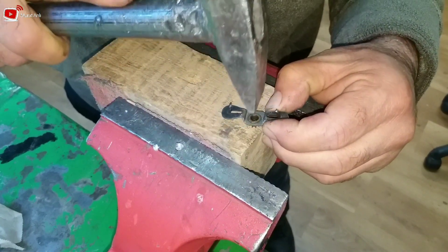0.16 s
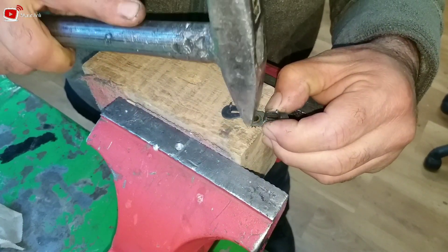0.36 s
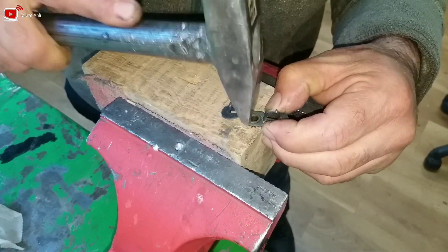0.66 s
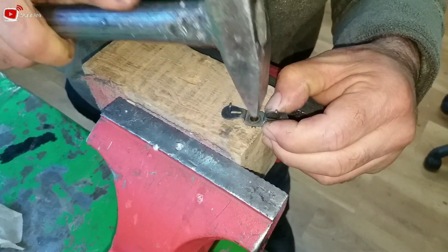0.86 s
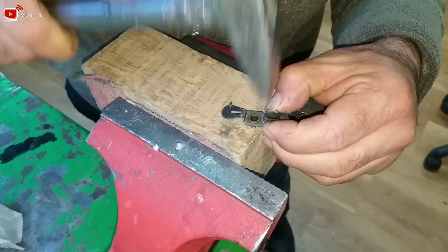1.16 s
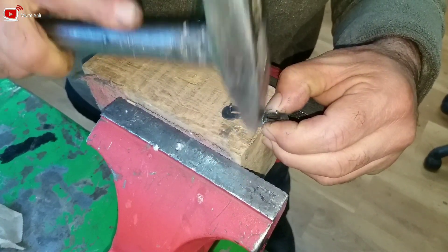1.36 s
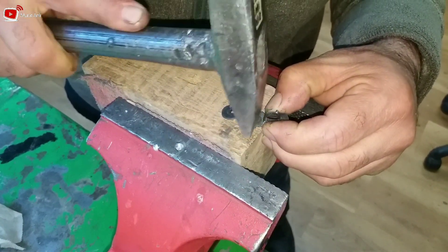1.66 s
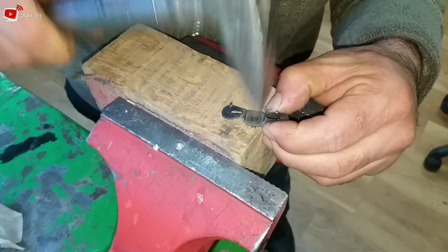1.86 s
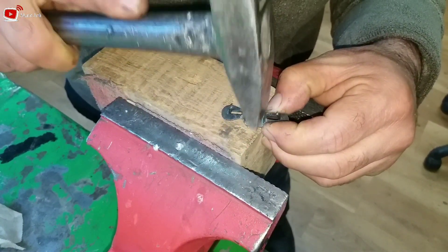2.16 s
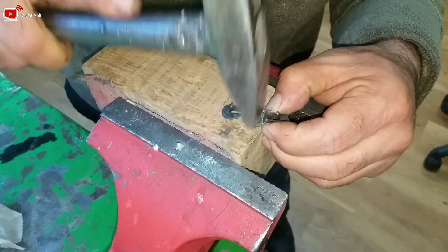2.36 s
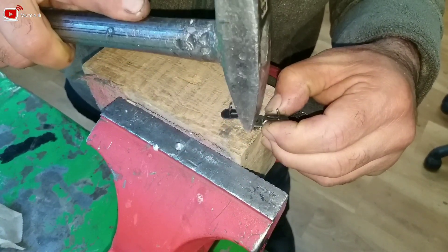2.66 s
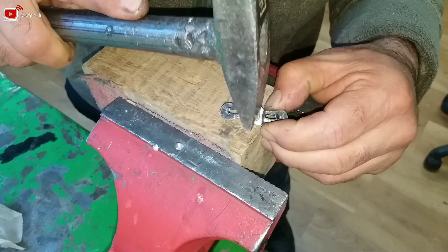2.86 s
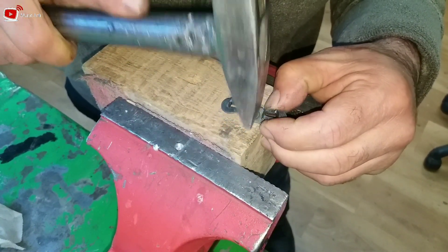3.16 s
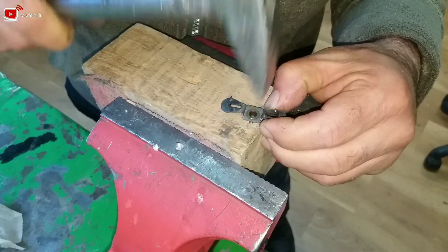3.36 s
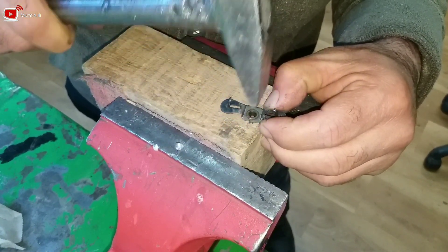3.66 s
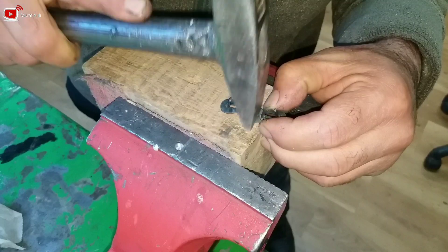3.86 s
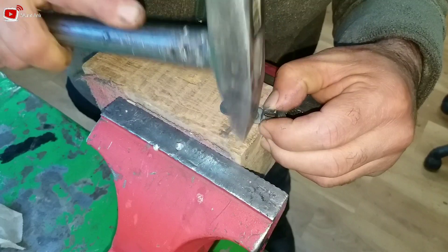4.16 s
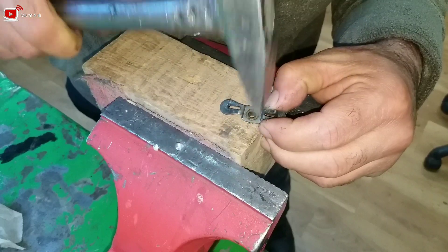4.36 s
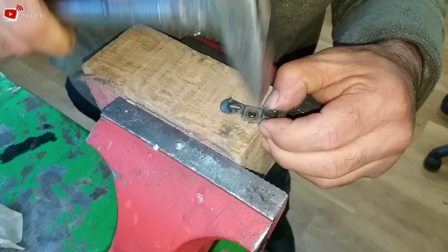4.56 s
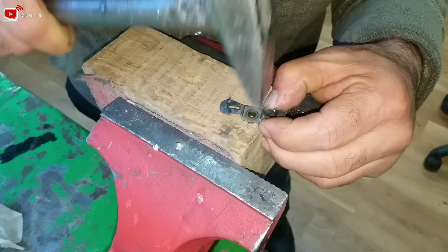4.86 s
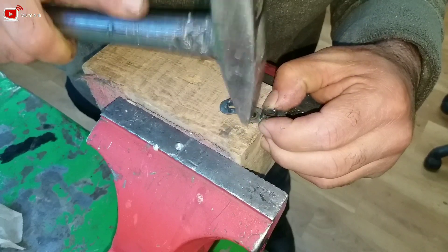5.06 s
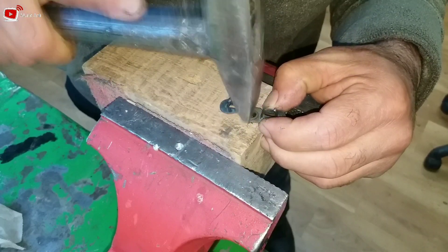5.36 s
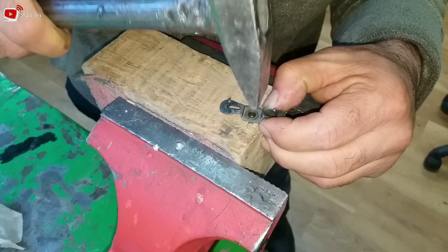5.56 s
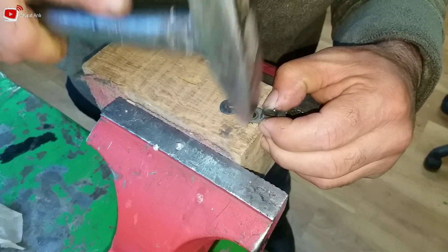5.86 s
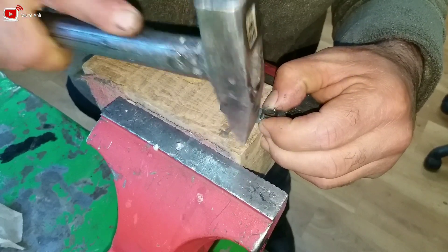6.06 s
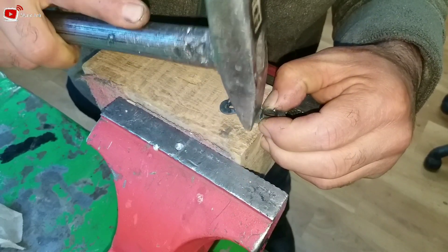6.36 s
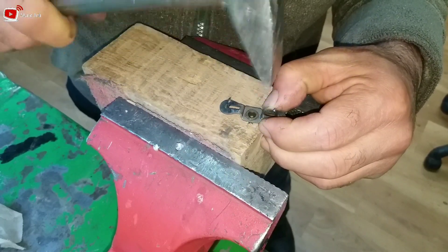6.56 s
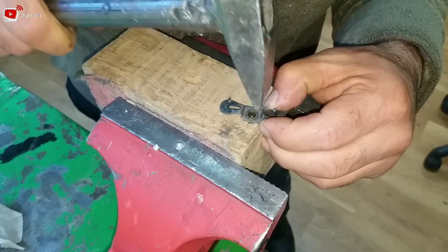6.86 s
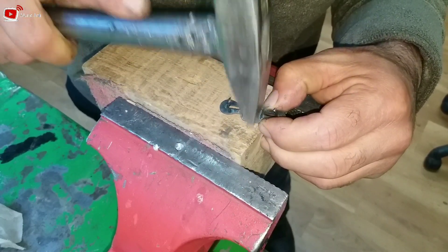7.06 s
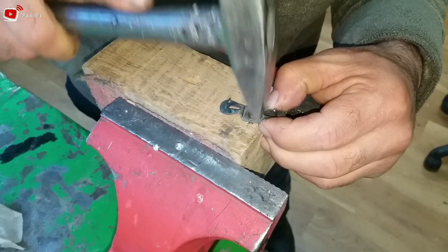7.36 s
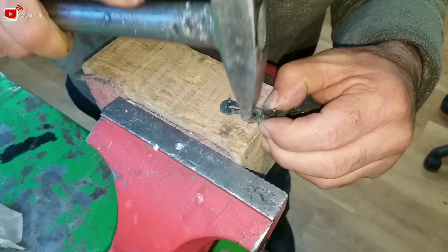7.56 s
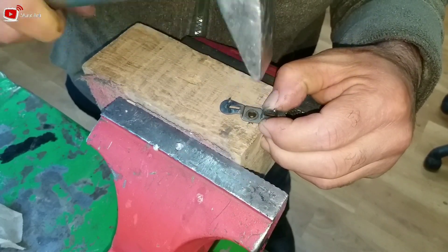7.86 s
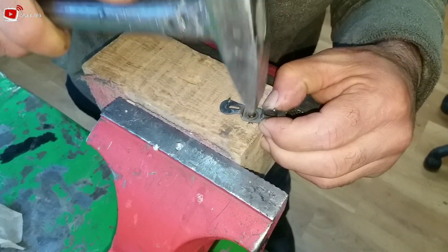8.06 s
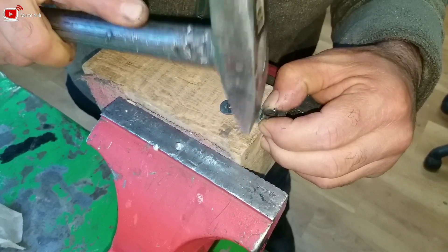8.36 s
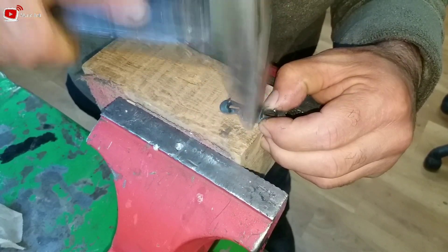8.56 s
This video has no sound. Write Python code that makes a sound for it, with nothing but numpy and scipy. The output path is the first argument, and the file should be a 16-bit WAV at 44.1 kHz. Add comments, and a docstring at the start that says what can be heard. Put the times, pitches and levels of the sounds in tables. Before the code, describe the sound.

A steel hammer strikes a small rivet on a wooden block held in a vice, close to the microphone in a bare workshop. From about 0.3 seconds, light aiming taps alternate with hard blows, roughly three strokes a second. Each is a sharp clack of steel with a knock of wood, followed at once by a tiny tick as the head bounces. The hard blows are fuller and set the bench and room booming, with a short echo and a lingering low ring. After a tap at about 2.2 seconds the hammering pauses, and the head just touches the rivet with two faint clicks around 2.5 seconds. The strokes resume at about 3.2 seconds and keep the same light and heavy rhythm until a last hard blow at about 8.6 seconds. A faint low rumble and a thin hum continue underneath throughout.

```python
"""Setting a rivet in a bare workshop

Close by, a steel hammer sets a small rivet on a wooden block clamped in a vice. Hard blows alternate
with light aiming taps, about three a second, with one short pause; the head bounces once after each.
Each blow is a clack of steel and a knock of wood; bench and room boom on over a faint rumble and hum."""
import sys
import numpy as np
from scipy import signal
from scipy.io import wavfile
from scipy.ndimage import uniform_filter1d

SR = 44100
rng = np.random.default_rng(int(sys.argv[2]) if len(sys.argv) > 2 else 0)


def int16_out(signal):
    """Quantize to a 16-bit WAV file."""
    q = np.round(np.clip(np.atleast_2d(signal).T, -1, 1) * 32767)
    wavfile.write(sys.argv[1], SR, q.astype(np.int16))


N = 383611

# spectrum of the contact crack: (frequency [Hz], level [dB])
CRACK_EQ = [(30, -30), (70, 9), (140, 23.5), (500, 11), (1000, 10.5), (2000, 11), (2600, 8.5), (4400, 15.5),
            (5800, 11.5), (8100, 12.5), (9500, -2.5), (11000, -3), (12800, -6), (15000, -9)]
# quickly damped modes of block and workpiece: (frequency [Hz], level [dB], t60 [s])
BLOCK_MODES = [(1040, -26, .04), (1329, -22, .04), (1535, -19, .045), (1810, -11, .045), (2055, -19, .04),
               (3219, -23, .025), (3738, -18, .022), (4385, -10, .022), (4900, -19, .02), (7550, -21, .015)]
# a bite on the rivet's edge gives more tick: (frequency [Hz], share of the tick gain [0-1])
TICK_BANDS = [(4500, 0.076), (7000, .45), (11000, 1)]


def hammer(near_db_per_db=0.3543, steel_db=-4, bounce_s=0.031, scatter_s=0.003, poses=3):
    """Strokes, bounces and touches: the close sound, a room send per arm pose, the pushes on the bench."""
    # taps and blows: (time [s], force [dB], clack [dB], tick [dB], bounce relative to force [dB])
    strokes = [(0.3188, -16.5, -3.5, -11, -12.5), (0.603, 3.5, 0.5, -5, -14.5),
               (0.9961, -14.5, -2, 0.5, -12), (1.2808, .5, -1.5, 1.5, -25), (1.6198, -20.5, 3.5, 4, -14),
               (1.9022, -5.5, 4, 3.5, -29), (2.2322, -17, -2, -7, -32), (3.1841, -19, -3, -5.5, -25),
               (3.4874, -2, 0.5, 2, -15.5), (3.803, -13, 2, 0, -14.5), (4.0822, -4.5, 6, 3, -26.5),
               (4.421, -13, 2.5, 6, -20), (4.7005, -0.5, 0, 2.5, -15), (5.0664, -22, -0.5, -0.5, -25),
               (5.361, 1.5, 0.5, 0, -23), (5.722, -12.5, -6, -7, -11), (6.0096, 0, -0.5, 1.5, -19.5),
               (6.3391, -19, -8, 2, -13), (6.6327, -3.5, 0, 1.5, -24), (6.9632, -17.5, 2.5, 4, -16.5),
               (7.261, -3.5, -4, -1.5, -31), (7.6072, -13, 1, -27, -12), (7.9295, 2.5, 1.5, -1, -17),
               (8.2808, -13, -4, -0.5, -23), (8.569, 0.5, -3, 1, -14)]
    # clear modes of the steel head: (frequency [Hz], level [dB], t60 [s])
    head_modes = [(6490, -20, .11), (10570, -34, .07), (11790, -45, .06), (12650, -42, .07)]
    # in the pause the head just touches the rivet: (time [s], level [dB])
    touches = [(2.4909, -48), (2.5826, -32)]
    t = np.arange(8192) / SR
    near, sends, pushes = np.zeros((2, N)), np.zeros((poses, 2, N)), np.zeros((1, N))
    for k, (s, force_db, clack_db, tick_db, bounce_db) in enumerate(strokes):
        force, tone = amp(force_db), stroke_tone(force_db, clack_db, tick_db)
        crack = force * colour(steady_bass(strike(t)), tone)
        # the fingers' grip shifts the modes of the workpiece a little from blow to blow
        ringing = ring(t, BLOCK_MODES, detune=0.01) + amp(steel_db) * ring(t, head_modes)
        clank = force * colour(ringing, tone)
        # a light tap is mostly contact noise; a hard blow sets the whole bench sounding into the room
        near_db = -3 - near_db_per_db * force_db
        add(near, s, amp(near_db) * (crack + amp(2) * clank))
        # the room gathers the crack from all directions, which evens out its colour
        even_crack = steady_bass(strike(t, crush=0.31, rattle=0.7, snap=1.422))
        add(sends[k % poses], s, force * colour(even_crack, tone) + amp(-14) * clank)
        add(pushes, s, amp([[force_db]]))
        # the head falls back on the same spot, with the same tick
        landing_s = s + bounce_s + scatter_s * rng.standard_normal()
        tick_eq = [(hz, share * tick_db) for hz, share in TICK_BANDS]
        bounce = colour(click(t, force_db + bounce_db), tick_eq)
        add(near, landing_s, bounce)
        add(sends[0], landing_s, amp(-6) * bounce)
    for s, level_db in touches:
        touch = click(t, level_db)
        add(near, s, touch)
        add(sends[0], s, amp(-8) * touch)
        add(pushes, s, amp([[level_db - 10]]))
    return near, sends, pushes


def strike(t, crush_t60=0.0085, rattle_t60=0.087, crush=0.96, rattle=0.98, snap=0.94):
    """One contact: a snap, the rivet crushing, and a short rattle in the block."""
    envelopes = np.array([fade(t, crush_t60), fade(t, rattle_t60)])
    bursts = rng.standard_normal((2, 2, len(t))) * envelopes[:, None]
    bursts /= np.linalg.norm(bursts, axis=2, keepdims=True)
    force = crush * bursts[0] + rattle * bursts[1]
    force[[0, 1], [0, 3]] += snap  # reaches the right ear three samples later
    return colour(force, CRACK_EQ)


def steady_bass(sound, crossover_hz=600):
    """In the bass every stroke is the same plain push, alike at both ears."""
    push = np.zeros_like(sound)
    push[:, 0] = 1
    low, high = (signal.butter(4, crossover_hz, kind, fs=SR, output="sos") for kind in ("low", "high"))
    return signal.sosfilt(low, colour(push, CRACK_EQ)) + signal.sosfilt(high, sound)


def stroke_tone(force_db, clack_db, tick_db, yield_db=-12.5, knee_db=0.5):
    """EQ of one stroke: from light to hard as the rivet gives, plus the clack and tick of its landing."""
    # colour of a light aiming tap: (frequency [Hz], gain [dB])
    light_eq = [(450, 0.5), (1500, -11), (3000, -11.5), (4500, -6), (7000, -5.5), (11000, -6)]
    # colour of a hard blow that drives the rivet home: (frequency [Hz], gain [dB])
    hard_eq = [(450, 0), (1500, -2), (4800, -4), (11000, 0.5)]
    # a square hit gives more clack: (frequency [Hz], weight of the clack gain [ratio])
    clack_bands = [(450, 0.15), (1500, 0.0098), (3000, 0.3), (4500, 1.1), (7000, 0.034), (11000, 0.06)]
    hz, light_db = np.transpose(light_eq)
    hardness = (1 + np.tanh((force_db - yield_db) / knee_db / 2)) / 2
    landing_db = clack_db * curve(clack_bands, hz) + tick_db * curve(TICK_BANDS, hz)
    return list(zip(hz, (1 - hardness) * light_db + hardness * curve(hard_eq, hz) + landing_db))


def ring(t, modes, detune=0, scatter_db=1.5):
    """Struck modes as dying sines; the head never lands on quite the same spot, so their levels vary."""
    left_lead, sound = np.array([[np.pi / 2], [0]]), 0
    for hz, db, t60 in modes:
        offset_db, shift = rng.normal(0, [scatter_db, detune])
        cycles = hz * (1 + shift) * t + rng.random()
        sound = sound + amp(db + offset_db) * fade(t, t60) * np.sin(2 * np.pi * cycles + left_lead)
    return sound


def click(t, level_db):
    """The head meets the rivet under its own weight: a thin click."""
    # bright colour of a rebound: (frequency [Hz], gain [dB])
    rebound_eq = [(400, -18), (1500, -9), (4500, 0), (12000, -4)]
    sound = colour(strike(t) + ring(t, BLOCK_MODES), rebound_eq)
    return amp(level_db) * sound / abs(sound).max()


def bench_boom(pushes, build_s=0.021, spread_rad_per_hz=0.00031):
    """Low modes build up and hang on; the shorter their waves, the more the two ears differ."""
    # low modes of bench and room: (frequency [Hz], level [dB], t60 [s])
    low_modes = [(64.24, -45, 1.7), (95.3, -56.5, 1.1), (119, -52, 0.81), (127, -36.5, 1.79),
                 (136.9, -36, 1.2), (168.7, -38, 0.33), (181.6, -35, 1.8), (214.8, -35.5, 1.3),
                 (246, -53, .9), (300, -33.5, 1.15), (357.3, -25, 0.61), (393.2, -32, 0.84),
                 (408, -42, 0.11), (439.7, -33, 0.59), (466.7, -42, 1.2), (551, -44.5, 0.84),
                 (663, -48, 0.54), (659, -34, 0.71), (998, -43.5, 0.42)]
    t, boom = np.arange(SR * 3 // 2) / SR, 0
    ears = np.array([[1], [-1]])
    for hz, db, t60 in low_modes:
        phase = rng.uniform(0, 2 * np.pi) + spread_rad_per_hz * hz * rng.choice([-1, 1]) * ears
        boom = boom + amp(db) * fade(t, t60) * np.sin(2 * np.pi * hz * t + phase)
    return signal.fftconvolve(pushes, boom * (1 - np.exp(-t / build_s)), axes=1)[:, :N]


def room_reverb(sends, mono_hz=480, ear_likeness=0.96, steady_hz=900):
    """Dense reflections of the bare workshop, each band rising and dying at its own speed."""
    # colour of the reflections: (frequency [Hz], gain [dB])
    reverb_eq = [(50, 16.5), (150, 7.5), (260, 3), (400, 18.5), (700, 7.5), (1100, 8.5), (1700, 6),
                 (2600, 5), (4400, 0), (7500, -8), (13000, -2.5)]
    # decay of the tail: (frequency [Hz], t60 [s])
    decay = [(100, 0.85), (400, 0.54), (800, 0.52), (2500, 0.58), (5000, .54), (8000, 0.49), (13000, 0.24)]
    # the bass builds up slowly: (frequency [Hz], rise time constant [s])
    rise = [(150, 0.061), (500, 0.0085), (1500, 0.0032), (8000, 0.0018)]
    hz, t, bands = signal.stft(rng.standard_normal((len(sends), 2, SR * 3 // 2)), SR, nperseg=256)
    hz = hz[:, None]
    # long waves are alike for every arm pose and at both ears; short waves scatter differently
    pose_match = np.exp(-(hz / steady_hz) ** 2 / 2)
    bands[1:] = pose_match * bands[0] + np.sqrt(1 - pose_match ** 2) * bands[1:]
    ear_match = ear_likeness * np.exp(-(hz / mono_hz) ** 2 / 2)
    bands[:, 1] = ear_match * bands[:, 0] + np.sqrt(1 - ear_match ** 2) * bands[:, 1]
    envelope = fade(t, curve(decay, hz)) * (1 - np.exp(-t / curve(rise, hz)))
    envelope /= np.linalg.norm(envelope, axis=1, keepdims=True) * np.sqrt(t[1] * SR)
    tails = signal.istft(bands * envelope * amp(curve(reverb_eq, hz)), SR, nperseg=256)[1]
    return signal.fftconvolve(sends, tails, axes=2).sum(0)[:, :N]


def room_tone(rumble_db=-59, hum_hz=291, hum_db=-64.5):
    """A faint low rumble with a thin hum."""
    # spectrum of the quiet workshop: (frequency [Hz], relative level [dB])
    rumble_eq = [(20, -16.5), (60, -12), (150, -1.5), (230, -32), (400, -25), (700, -35.5), (5000, -36),
                 (16000, -43)]
    noise = rng.standard_normal((3, N))
    rumble = colour(noise[:2] + noise[2], rumble_eq)
    hum = np.sin(2 * np.pi * hum_hz * np.arange(N) / SR)
    return amp(rumble_db) * rumble / rumble.std() + amp(hum_db) * hum


def suppress_noise(x, depth_db=-13):
    """Bands that sink to the threshold are turned down, which shortens faint tails."""
    # where each band closes: (frequency [Hz], level [dB])
    threshold = [(150, -61.5), (500, -65), (1200, -79), (5000, -80.5), (12000, -101.5)]
    hz, _, bands = signal.stft(x, SR, nperseg=512)
    power = abs(uniform_filter1d((abs(bands) ** 2).mean(0), size=3, axis=0))
    gain = amp(depth_db / (1 + power / amp(curve(threshold, hz))[:, None] ** 2))
    return signal.istft(bands * gain, SR, nperseg=512)[1][:, :N]


def amp(db):
    """Decibels to linear gain."""
    return 10 ** (np.asarray(db) / 20)


def fade(t, t60):
    """Decay of 60 dB in t60 seconds."""
    return np.exp(-np.log(1000) * t / t60)


def curve(points, hz):
    """Straight lines between points on a log-frequency axis."""
    point_hz, values = np.transpose(points)
    return np.interp(np.log(hz + 1), np.log(point_hz + 1), values)


def colour(x, eq, size=4096):
    """Minimum-phase EQ along a (frequency [Hz], gain [dB]) curve."""
    log_gain = np.log(amp(curve(eq, abs(np.fft.fftfreq(size, 1 / SR)))))
    taps = np.fft.ifft(np.exp(np.conj(signal.hilbert(log_gain)))).real[:size // 2]
    return signal.oaconvolve(x, taps[None], axes=1)[:, :x.shape[1]]


def add(mix, s, sound):
    """Lays a sound into the mix at s seconds."""
    part = mix[:, max(round(s * SR), 0):][:, :sound.shape[1]]
    part += sound[:, :part.shape[1]]


def scene():
    """The hammer sits slightly to the right, the boom of bench and room slightly to the left."""
    near, sends, pushes = hammer()
    tails = room_reverb(sends) + bench_boom(pushes)
    return near * amp([[-0.5], [0.5]]) + tails * amp([[0.7], [-0.7]]) + room_tone()


def record(dry, ceiling=0.7, cutoff_hz=15900):
    """Noise suppression, a soft overload on the highest peaks, then a steep low-pass."""
    x = suppress_noise(dry)
    x = x / (1 + (x / ceiling) ** 4) ** 0.25
    lowpass = signal.firwin(201, cutoff_hz, window=("kaiser", 9), fs=SR)
    return signal.oaconvolve(x, lowpass[None], "same", axes=1)


dry = scene()
out = record(dry)
int16_out(out)
```